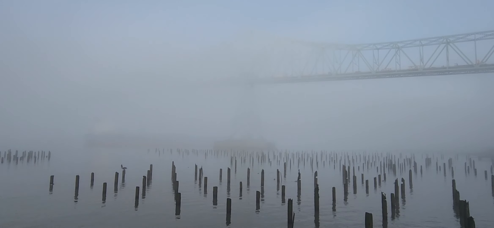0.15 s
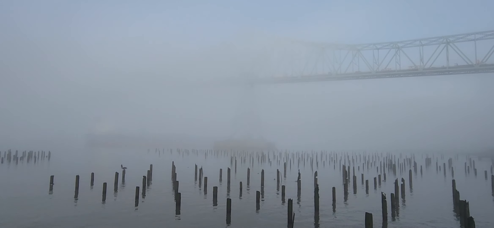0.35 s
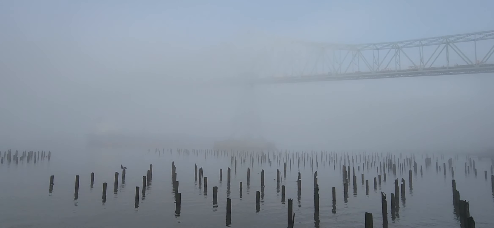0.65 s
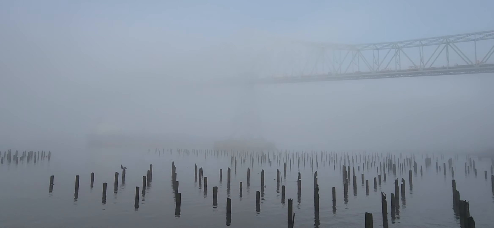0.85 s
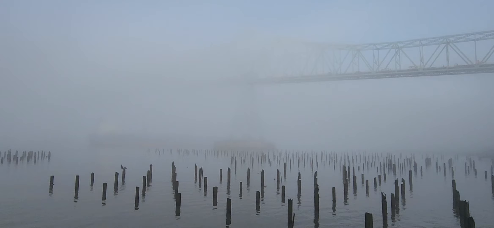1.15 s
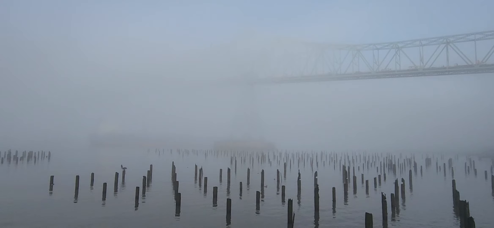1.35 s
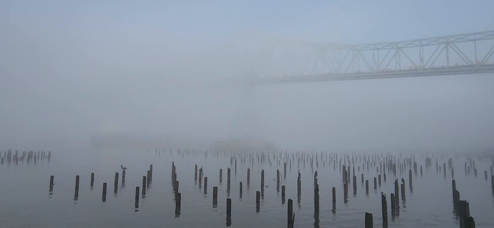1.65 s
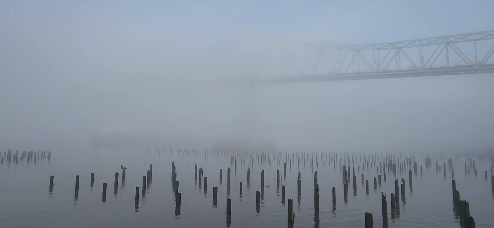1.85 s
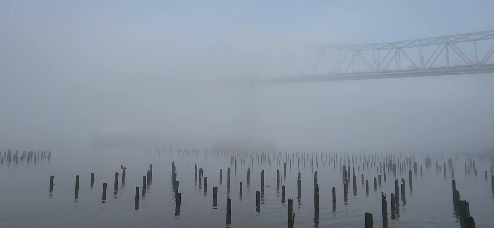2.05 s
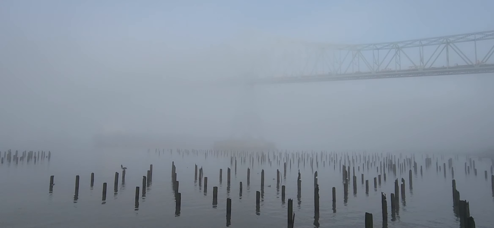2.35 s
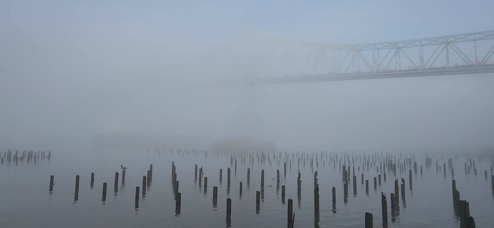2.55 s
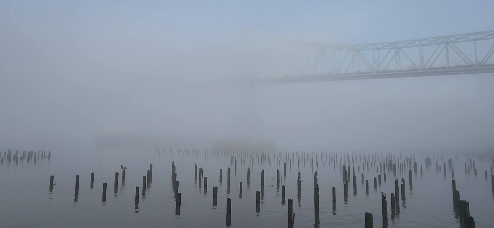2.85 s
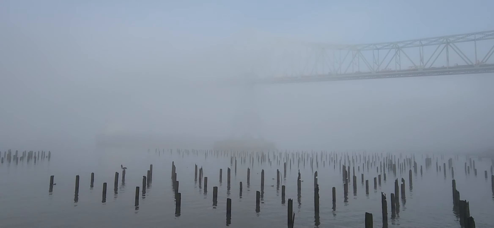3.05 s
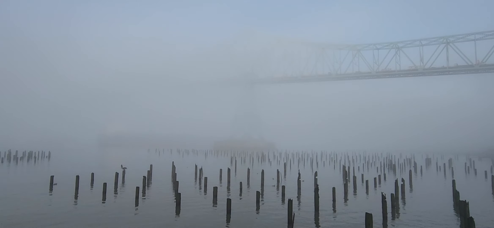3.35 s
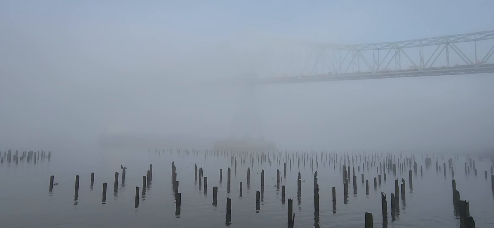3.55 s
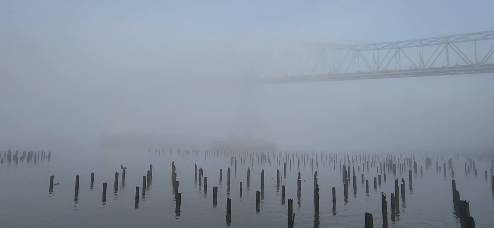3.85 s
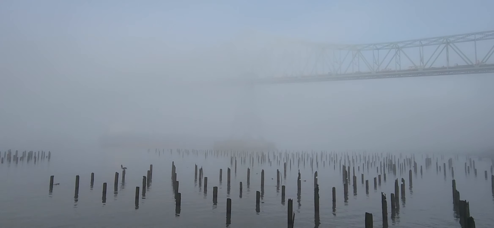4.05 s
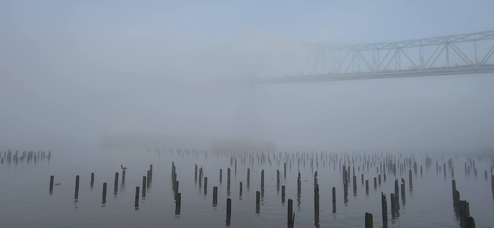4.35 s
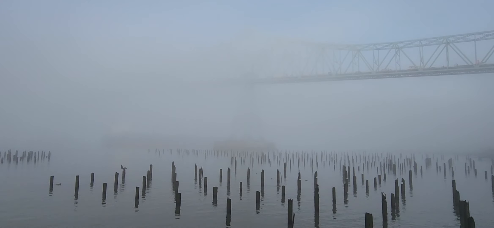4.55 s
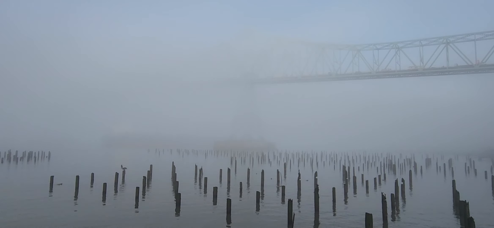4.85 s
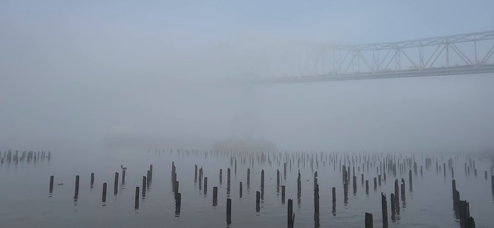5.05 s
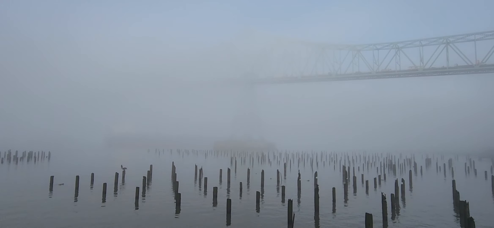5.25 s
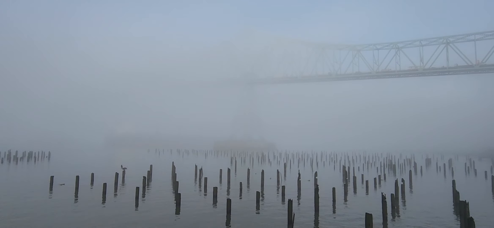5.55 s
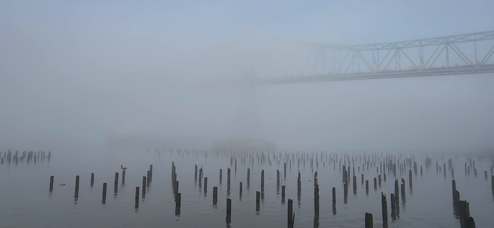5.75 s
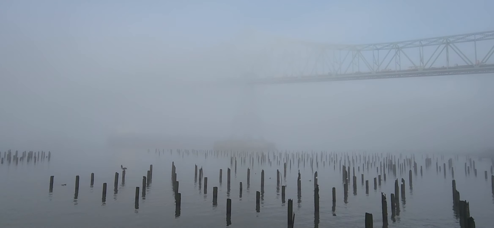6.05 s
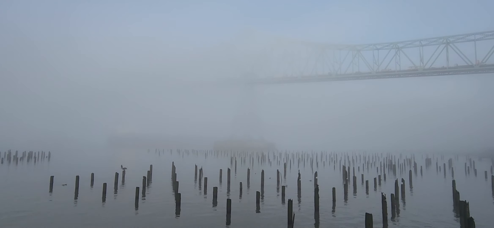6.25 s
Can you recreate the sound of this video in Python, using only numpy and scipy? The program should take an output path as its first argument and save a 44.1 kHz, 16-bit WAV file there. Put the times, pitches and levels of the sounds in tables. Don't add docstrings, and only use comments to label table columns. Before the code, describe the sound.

A continuous low drone dominates: pulsing marine engine, beating generator hum and a faint sustained horn fading in and out through fog. Dull rumble and soft road hiss lie around it. Six brief bird chirps and whistles are scattered early, each with a watery open-air echo. A long birdless stretch follows, then one very faint whistle and a final clipped call. Wide, distant stereo pickup from the shore by a small camera.

```python
import sys
import numpy as np
from scipy import signal
from scipy.fft import rfft, irfft, next_fast_len
from scipy.io import wavfile
from scipy.ndimage import uniform_filter1d

SR = 44100
rng = np.random.default_rng(int(sys.argv[2]) if len(sys.argv) > 2 else 0)


def materialize(psi):
    bounded = np.clip(np.atleast_2d(psi).T, -1, 1)
    quanta = np.round(bounded * 32767).astype(np.int16)
    wavfile.write(sys.argv[1], SR, quanta)


def invert_db(x):
    u = np.asarray(x, float) / 20
    return 10 ** u


N = 281799

# order, level_db
DIESEL_STEADY = [(7 / 3, -55), (10 / 3, -59), (11 / 3, -59), (14 / 3, -59), (10, -70), (11, -68), (12, -66),
                 (14, -57.5)]
# time_s, rate_hz
FIRING_RATE = [(0, 22.442), (3.2, 22.442), (3.6, 22.405), (6.39, 22.405)]
# time_s, order_2_throb_db, order_4_funnel_note_db
SHIP_APPROACH = [(0, -44.5, -33.5), (.5, -46, -33.5), (1.3, -40.5, -28), (2.3, -38.5, -30.5),
                 (2.9, -39.5, -28), (3.3, -34.5, -33), (4.1, -36.5, -36.5), (4.4, -37, -45),
                 (4.7, -35.5, -37.5), (5, -36.5, -41.5), (5.3, -33.5, -34), (6.15, -34.5, -37),
                 (6.39, -35, -29)]
# time_s, order_3_db, order_5_db, order_6_db
AIR_PATH = [(0, -45, -47.5, -44.5), (.5, -41.5, -45.5, -49.5), (1.099, -45.5, -43, -49),
            (1.5, -47, -45, -44), (1.9, -52.5, -45.5, -56), (2.5, -50, -49, -44.5), (3, -51, -40, -53.5),
            (3.55, -53, -50, -38), (4.1, -45, -48.5, -53), (4.499, -48.5, -51, -41), (4.9, -48, -56.5, -47),
            (5.299, -36.5, -52.5, -39.5), (5.6, -40, -64, -48), (5.95, -46.5, -47, -38.5),
            (6.39, -48, -41.5, -45)]
# time_s, left_minus_right_db
SHIP_PAN = [(0, -1), (1.2, 0.5), (3.5, 0.7), (5, 0.5), (6.39, 1)]
# time_s, level_db
HORN_NOTE = [(0.0, -45), (0.12, -42), (0.93, -48.5), (1.1, -39), (1.42, -51.5), (1.49, -44), (2.76, -38),
             (3.54, -43), (3.63, -52), (4.27, -43), (4.31, -51), (4.52, -41), (5.53, -41), (5.91, -45.5),
             (6.07, -45.5), (6.16, -45.5), (6.21, -63), (6.39, -52)]
HORN_SECOND = [(0.0, -53.5), (0.36, -46.5), (0.94, -60), (2.1, -43), (2.21, -56), (2.26, -43),
               (2.35, -59.5), (2.4, -49.5), (2.47, -59), (3.01, -62), (3.11, -52.5), (3.33, -60.5),
               (5.16, -56.5), (5.3, -66), (5.34, -55), (5.92, -47.5), (6.14, -65), (6.39, -61)]
HORN_THIRD = [(0.0, -72), (0.16, -62), (0.66, -51), (0.69, -63), (0.93, -61.5), (1.07, -70), (1.1, -56.5),
              (1.9, -63), (1.94, -50), (2.12, -59.5), (3.33, -63), (3.35, -59), (4.0, -68), (4.04, -50),
              (4.25, -64.5), (5.48, -54.5), (6.3, -62), (6.39, -67)]
# pitch_hz, level_db, twin_above_hz, twin_db, in_step_s
GENERATOR = (58.54, -47.5, .59, -52.3, 2.05)
# pitch_hz, level_db, wander_hz
HULL_HUMS = [(117.1, -52.5, .1), (305.55, -61, .2), (320.0, -67, .5), (137.2, -52, .8)]
# freq_hz, left_db_per_hz, right_db_per_hz, likeness_0_1, left_lead_rad
RUMBLE = [(18, -73.7, -75.1, 0.72, -0.0), (30, -68.8, -69.7, 0.91, -0.2), (45, -60.8, -61.5, 0.99, -0.2),
          (60, -63, -63.3, 0.98, -0.15), (75, -61.7, -61.7, 0.98, -0.1), (100, -61.5, -61.5, 0.98, -0.1),
          (135, -63, -63.2, 0.99, -0.1), (155, -65.7, -66.1, 0.96, -0.1), (190, -70.8, -71.0, 0.93, -0.1),
          (230, -70.3, -70.0, 0.91, -0.0), (250, -74.3, -74.5, 0.85, -0.1), (282, -76, -76.8, 0.72, -0.1),
          (298, -74, -74.8, 0.72, -0.1), (312, -70, -70.8, 0.8, -0.1), (326, -73.5, -74.2, 0.75, -0.1),
          (340, -72.5, -73.5, 0.7, -0.1), (450, -74.9, -76.5, 0.73, 0.2), (650, -77.7, -76.2, 0.37, 0.5),
          (900, -79.7, -79.6, 0.3, 0.6)]
# freq_hz, left_db_per_hz, right_db_per_hz, likeness_0_1
HISS = [(1100, -82.7, -82.2, 0.52), (1450, -83.0, -83.6, 0.63), (1800, -89.0, -91.1, 0.26),
        (2100, -89.1, -90.8, 0.37), (2450, -94.0, -100.3, 0.12), (3000, -95.0, -101.6, 0.19),
        (4000, -97.9, -103.8, 0.23), (4800, -105.5, -107.4, 0.32), (5400, -105.1, -105.7, 0.21),
        (6350, -108.0, -109.6, 0.26), (7200, -105.6, -108.9, 0.34), (8000, -104.5, -113, 0.31),
        (8500, -114.3, -119.5, 0.51), (9200, -118.6, -121.6, 0.86)]
# freq_hz, left_lead_rad
HISS_LEAD = [(1100, 2.3), (1450, 3.1), (1750, 3.0), (2200, .5), (2600, 2.9), (3400, 3.1)]
# freq_hz, lift_db
HARBOUR_LIFT = [(30, -0.5), (70, 2.5), (115, -0.5), (160, 3), (250, 1), (500, 2), (800, 1.5), (1300, 0.5),
                (2100, 1.4), (3000, -0.1), (4200, -1.1), (9000, 0.3)]
# centre_hz, width_hz, gain_db
PORTS = [(4150, 190, 3), (5360, 160, 4), (6400, 150, -4), (7140, 290, 2), (7490, 70, 4), (7989, 30, 12),
         (9200, 120, -12)]
# crest_s, crest_hz, rise_s, fall_s, effort_db
BIRD_CALLS = [
    (.379, 1370, .022, .010, -51.5),
    (1.392, 990, .027, .002, -53.5),
    (1.424, 1095, .020, .007, -54.5),
    (1.618, 2502, .037, .0365, -47),
    (1.998, 1557, .022, .016, -55.5),
    (2.69, 1187, .021, .009, -49.5),
    (6.116, 1580, .024, .011, -68),
    (6.338, 1230, .027, .006, -58.5),
]
# left_minus_right_db, left_lag_ms, crest_hold_s, softer_db_per_octave, echo_db
PERCHES = [(-1.5, .16, .023, -4, -5), (-2, .01, .008, 12, -6), (-3, .01, .012, 12, -6),
           (-1.5, .041, .014, 4.5, 0), (-5, .051, .009, 1, -6), (4, .068, .016, 55, -4),
           (1, .15, .009, 7.5, -4), (0, .11, .005, 8, -4)]
FLUTTER_DB = (2.5, 2.4, 5, 5)
# freq_hz, left_db, right_db
BIRD_PATH = [(900, -22, -22), (1500, -10, -10), (1850, -1, -2), (2080, 7, 3), (2450, 1, -5), (2800, 0, -4),
             (3200, 2, 5), (3500, -7, -5), (3900, -22, -23), (5000, -24, -19), (5800, -32, -32),
             (6700, -36, -36), (7600, -13.5, -9), (8100, -18, -16), (9000, -40, -40)]
# left_delay_s, right_delay_s, left_db, right_db
FAR_ECHOES = [(.085, .078, -17, -13), (.104, .112, -18, -17), (.124, .15, -13, -15), (.14, .135, -17, -18),
              (.232, .222, -13, -8), (.245, .238, -15, -11), (.262, .253, -14, -11), (.3, .292, -16, -14),
              (.41, .405, -17, -14)]
# left_delay_s, right_delay_s, left_db, right_db
QUAY_ECHOES = [(.027, .031, -17, -11), (.044, .046, -13, -6.5), (.058, .066, -16, -10)]
# freq_hz, left_share_lost, right_share_lost
BAND_LOSS = [(7900, 0, 0), (8300, .05, .25), (8800, .5, .85), (9200, .75, .95), (9900, .65, .3),
             (10600, .75, .92), (11300, .03, .2), (14900, .02, .05), (15600, .15, .7)]
# freq_hz, mid_db, side_db
COARSENESS = [(170, 24, 15), (500, 21, 17), (850, 18, 16), (1200, 7, 10), (1650, 5, 6), (2250, 9, 6),
              (3000, 10, 11), (4000, 7, 3), (5200, 2, -5), (6300, -3, -7.5), (7600, 5, 4), (8200, 4, 3),
              (8600, -6, -6), (9500, -6, -6), (9900, 30, 30)]


def in_time(rows):
    time_s, *columns = np.transpose(rows)
    return [np.interp(np.arange(N) / SR, time_s, column) for column in columns]


def at_hz(rows, hz):
    freq_hz, *columns = np.transpose(rows)
    return [np.interp(np.log(hz + 1e-9), np.log(freq_hz), column) for column in columns]


def drift(rate_hz):
    pole = np.exp(-80 * np.pi * rate_hz / SR)
    noise = rng.standard_normal(N // 40 + 4002)
    slow = signal.lfilter([1], [1, -2 * pole, pole * pole], noise)[4000:]
    return np.interp(np.arange(N) / 40, np.arange(len(slow)), slow / np.std(slow))


def tone(cycles, level_db):
    return np.sqrt(2) * invert_db(level_db) * np.cos(2 * np.pi * cycles)


def diesel():
    first_firing_cycles, pulse_turn_cycles = .3, .55
    funnel_turn_cycles = .17
    cycles = np.cumsum(in_time(FIRING_RATE)[0]) / SR - first_firing_cycles
    throb_db, funnel_db = in_time(SHIP_APPROACH)
    orders = [(2, throb_db), (4, funnel_db)]
    orders += zip((3, 5, 6), in_time(AIR_PATH))
    orders += [(order, level_db + 2.0 * drift(.8)) for order, level_db in DIESEL_STEADY]
    out = np.zeros(N)
    for order, level_db in orders:
        turn = pulse_turn_cycles - funnel_turn_cycles * (order == 3)
        out += tone(order * cycles + turn, level_db)
    return out


def horn():
    t = np.arange(N) / SR
    out = tone(175.45 * t + 0.0098 * drift(0.68), in_time(HORN_NOTE)[0])
    out += tone(351.9 * t + 0.1 * drift(1.3), in_time(HORN_SECOND)[0])
    out += tone(527.0 * t + 0.13 * drift(1.1), in_time(HORN_THIRD)[0])
    return out


def generator():
    pitch_hz, level_db, above_hz, twin_db, in_step_s = GENERATOR
    t = np.arange(N) / SR
    cycles = pitch_hz * t + 0.12 * drift(0.83)
    return tone(cycles, level_db) + tone(cycles + above_hz * (t - in_step_s), twin_db)


def hull_hums():
    out = np.zeros(N)
    for pitch_hz, level_db, wander_hz in HULL_HUMS:
        cycles = np.cumsum(pitch_hz + wander_hz * drift(1.35)) / SR + rng.random()
        out += tone(cycles, level_db + 3 * drift(1.0))
    return out


def ship_and_drones():
    lag_samples = 9
    mono = diesel() + horn() + generator() + hull_hums()
    pan_db = in_time(SHIP_PAN)[0]
    late = np.interp(np.arange(N) - lag_samples, np.arange(N), mono)
    return np.array([late * invert_db(pan_db / 2), mono * invert_db(-pan_db / 2)])


def harbour(patchy_db):
    mic_lag_s = 19 / 44100
    size = next_fast_len(N)
    hz = np.fft.rfftfreq(size, 1 / SR)
    electronics = [(9600, -122, -128, .2), (10100, -126, -124, .2), (10700, -130, -132, .2),
                   (11800, -128, -132, .2), (16000, -130, -134, .2)]
    floor = [(3.2, -110, -110, 1.0)] + [row[:4] for row in RUMBLE] + HISS + electronics
    left_db, right_db, alike = at_hz(floor, hz)
    lead_rad = at_hz([(row[0], row[4]) for row in RUMBLE] + HISS_LEAD, hz)[0]
    lead_rad = np.where(hz > HISS_LEAD[-1][0], 2 * np.pi * hz * mic_lag_s, lead_rad)

    ports_db = sum(db / (1 + (2 * (hz - centre) / width) ** 2) for centre, width, db in PORTS)
    lift_db = ports_db + at_hz(HARBOUR_LIFT, hz)[0]
    peaks_db = np.clip(ports_db, 0, 12)
    left_db = left_db + lift_db
    right_db = right_db + lift_db - 0.27 * peaks_db
    alike = np.clip(alike + 0.043 * peaks_db, 0, 1)

    shared, own = rfft(rng.standard_normal((2, size))) * np.sqrt(SR / 2)
    right = invert_db(right_db) * shared
    left = invert_db(left_db) * (alike * shared * np.exp(1j * lead_rad) + np.sqrt(1 - alike ** 2) * own)
    out = 0
    octave = np.log2(np.clip(hz, 60, 7680) / 60)
    together = drift(.7)
    for k in range(8):
        share = np.clip(1 - np.abs(octave - k), 0, 1)
        flicker = invert_db(patchy_db * (.5 * together + drift(13.0)))
        out = out + flicker * irfft(share * np.array([left, right]), size)[:, :N]
    return out


def lorry_lift():
    centre_s, lasts_s, lift_db = 5.97, .3, 0.5
    return invert_db(lift_db * np.exp(-((np.arange(N) / SR - centre_s) / lasts_s) ** 2))


def birds():
    rest_hz, pitch_jitter = 949, .005
    rises, falls = 1.7, 5.0
    attack_s, release_falls = .012, 2.0
    thinner_db = 36.5
    second_db, third_db, third_grows, full_voice_db = -6, -11, 1.8, -47
    fourth_falling_db, fourth_rising_db = 8, -14
    out, echoing = np.zeros((2, 2, N))
    flutter_db = [depth_db * drift(80.0) for depth_db in FLUTTER_DB]
    unsteady = 1 + pitch_jitter * drift(45.0)
    for call_row, perch in zip(BIRD_CALLS, PERCHES):
        crest_s, crest_hz, rise_s, fall_s, effort_db = call_row
        pan_db, lag_ms, hold_s, softer_db, echo_db = perch
        end_s = hold_s + falls * fall_s
        n = np.arange(round((crest_s - rises * rise_s) * SR), min(round((crest_s + end_s) * SR), N))
        t = n / SR - crest_s
        rising = np.exp(-np.abs(t / rise_s) ** 2.2)
        falling = 1 / np.cosh(np.maximum(t - hold_s, 0) / fall_s)
        arch = np.where(t < 0, rising, falling)
        pitch_hz = (rest_hz + (crest_hz - rest_hz) * arch) * unsteady[n]
        sag_octaves = np.abs(np.log2(crest_hz / pitch_hz))

        level_db = effort_db - softer_db * sag_octaves
        third = third_db + third_grows * np.minimum(level_db - full_voice_db, 0)
        fourth = third + np.where(t > 0, fourth_falling_db, fourth_rising_db)
        partials_db = (-thinner_db * sag_octaves ** 3, second_db, third, fourth)
        attack = (n - n[0]) / SR / attack_s
        release = (end_s - t) / (release_falls * fall_s)
        fade = np.clip(np.minimum(attack, release), 0, 1)
        for ear, side in enumerate((1, -1)):
            cycles = np.cumsum(pitch_hz) / SR - pitch_hz * lag_ms / 1000 * (ear == 0)
            call = 0
            for k, partial_db in enumerate(partials_db):
                heard_db = level_db + side * pan_db / 2 + partial_db + flutter_db[k][n]
                call = call + fade * tone((k + 1) * cycles, heard_db)
            out[ear, n] += call
            echoing[ear, n] += invert_db(echo_db) * call
    return out, echoing


def tap(left_s, right_s, left_db, right_db):
    at = np.round([[left_s * SR], [right_s * SR]])
    return (np.arange(SR) == at) * invert_db([[left_db], [right_db]])


def fog(echoes, order, highs_kept):
    dull = signal.sosfilt(signal.butter(order, 2850, fs=SR, output="sos"), echoes)
    return highs_kept * echoes + (1 - highs_kept) * dull


def shore(calls, echoing):
    t60_s, scatter_db = .8, -4
    bridge_s, bridge_db, smear_s = .25, -16, 0.02
    water_left_s, water_right_s, water_db = 3.1 / 1000, 3.95 / 1000, -7
    size, t = next_fast_len(N + SR), np.arange(SR) / SR
    scatter = rng.standard_normal((2, SR)) * invert_db(-60 * t / t60_s) * (t > .012)
    girders = scatter * np.exp(-((t - bridge_s) / smear_s) ** 2)
    echoes = invert_db(scatter_db) * scatter / np.linalg.norm(scatter[0])
    echoes += invert_db(bridge_db) * girders / np.linalg.norm(girders[0])
    echoes += sum(tap(*row) for row in FAR_ECHOES)
    quay = sum(tap(*row) for row in QUAY_ECHOES)
    echoes = fog(echoes, 6, .08) + fog(quay, 4, .5)

    direct = tap(0, 0, 0, 0) - tap(water_left_s, water_right_s, water_db, water_db)
    colour = invert_db(np.array(at_hz(BIRD_PATH, np.fft.rfftfreq(size, 1 / SR))))
    heard = rfft(calls, size) * rfft(direct, size) + rfft(echoing, size) * rfft(echoes, size)
    return irfft(heard * colour, size)[:, :N]


def scene():
    return ship_and_drones() + lorry_lift() * harbour(patchy_db=0.31) + shore(*birds())


def drop_bands(x):
    hz, _, frames = signal.stft(x, SR, nperseg=1024, boundary="odd")
    count = frames.shape[2]
    chance = rng.standard_normal((2, 65, count)) + .8 * rng.standard_normal((2, 1, count))
    chance = uniform_filter1d(chance, size=3, axis=2)
    rank = chance.ravel().argsort().argsort().reshape(chance.shape) / chance.size
    share_lost = np.array(at_hz(BAND_LOSS, hz))[:, :, None]
    kept = rank[:, np.arange(len(hz)) // 8] > share_lost
    return signal.istft(frames * kept, SR, nperseg=1024)[1][:, :N]


def coarsen(x):
    residue_db, residue_spread_db = -26, 9
    hop, lead = 1024, 2048 - 219
    n = np.arange(2 * hop)
    basis = np.cos(np.pi / hop * np.outer(n[:hop] + .5, n + .5 + hop / 2)) * np.sqrt(2 / hop)
    basis = basis * signal.windows.kaiser_bessel_derived(2 * hop, 4 * np.pi)
    count = (N + lead) // hop + 1
    ends = ((0, 0), (lead, (count + 1) * hop - N - lead))
    pair = np.pad([x[0] + x[1], x[0] - x[1]], ends, mode="reflect", reflect_type="odd") / 2
    halves = pair.reshape(2, count + 1, hop)
    bins = np.concatenate([halves[:, :-1], halves[:, 1:]], axis=2) @ basis.T

    band_rms = np.sqrt(np.mean(bins.reshape(2, count, 64, 16) ** 2, axis=3) + 1e-20)
    step = np.repeat(band_rms * invert_db(2 * rng.standard_normal(band_rms.shape)), 16, axis=2)
    bin_hz = (n[:hop] + .5) * SR / 2 / hop
    step = step * invert_db(-np.array(at_hz(COARSENESS, bin_hz)))[:, None]
    bins = np.sign(bins) * np.floor(np.abs(bins / step) ** .75 + .4054) ** (4 / 3) * step
    spread = np.clip(rng.standard_normal((count, 1)), -2, 1.5)
    residue = invert_db(residue_db + residue_spread_db * spread)
    frames = (bins + residue * step * rng.standard_normal(bins.shape)) @ basis
    joined = (frames[:, 1:, :hop] + frames[:, :-1, hop:]).reshape(2, -1)
    mid, side = joined[:, lead - hop:lead - hop + N]
    return np.array([mid + side, mid - side])


def low_pass(x):
    return signal.sosfilt(signal.butter(12, 15720, fs=SR, output="sos"), x)


def record(dry):
    mix = coarsen(drop_bands(dry))
    return low_pass(mix)


dry = scene()
out = record(dry)
materialize(out)
```